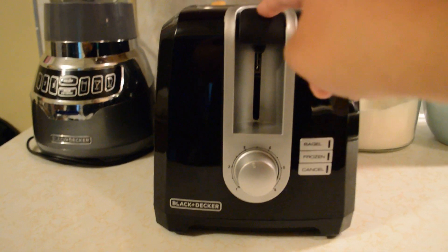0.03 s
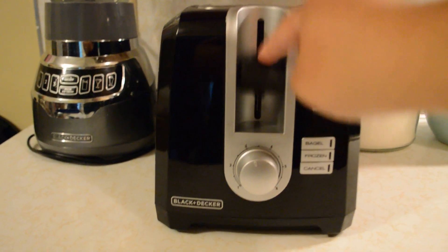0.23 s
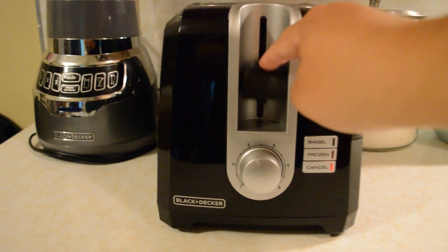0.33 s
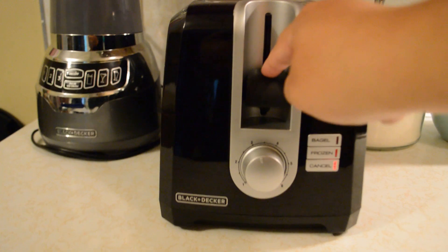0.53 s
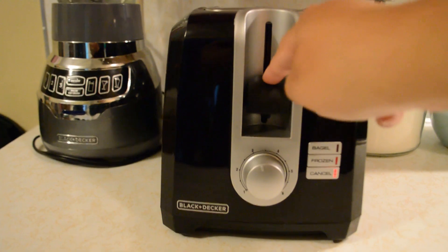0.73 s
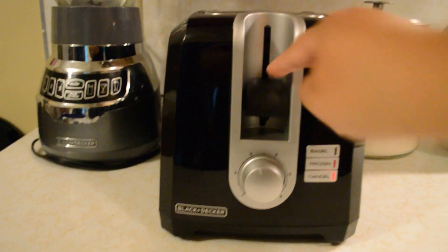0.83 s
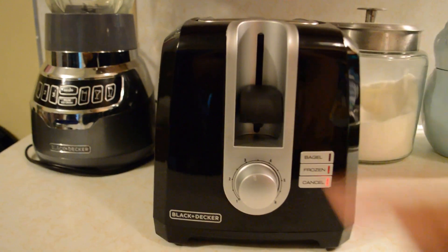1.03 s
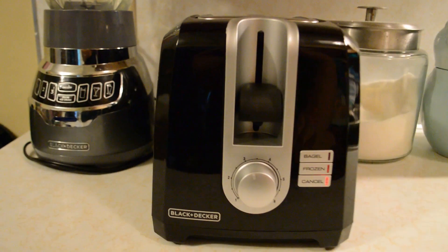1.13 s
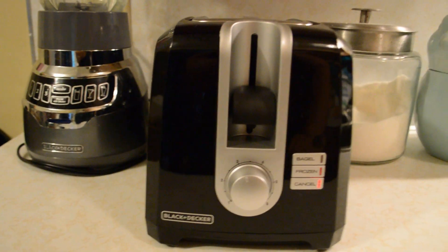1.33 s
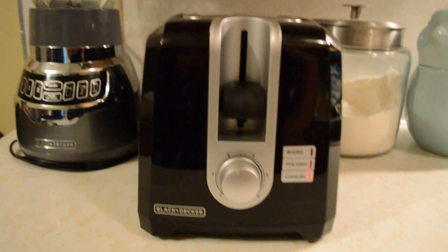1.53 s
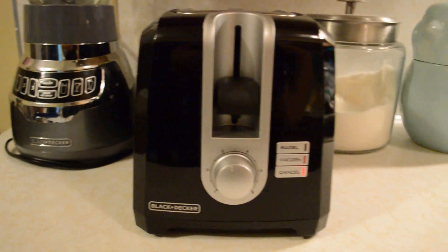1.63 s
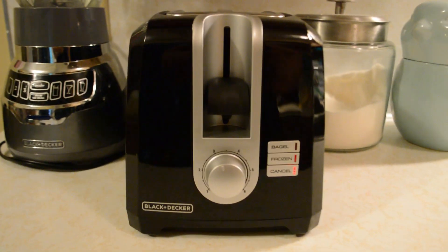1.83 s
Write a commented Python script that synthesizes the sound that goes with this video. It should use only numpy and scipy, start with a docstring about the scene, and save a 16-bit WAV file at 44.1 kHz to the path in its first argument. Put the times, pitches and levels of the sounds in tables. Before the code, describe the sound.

A toaster lever is pushed down, close and mono, in a quiet kitchen. Faint touches and finger rubbing lead to a knock at 0.2 s, then a gritty, jerky metal scrape with a slight squeak until 0.45 s. A sharp clack at 0.46 s rings and rattles briefly with a case thud. A softer double knock comes at 0.72 s. Steady hiss and low hum remain, with tiny ticks from 1.37 to 1.87 s.

```python
"""A finger pushes a toaster lever down in a quiet kitchen, close to a mono microphone.
From the first knock on the knob until after the clack the case thuds on the counter (struck modes).
The finger rubs the knob, the carriage scrapes down its rails in jerks (gritty noise), the latch clacks shut,
the spring rings and loose parts rattle; single-ring ticks are scattered before, during and after the clack.
Room hum, mains hum, a thin whine and microphone hiss lie under it all, ducked a little by gain control."""
import sys
import numpy as np
from scipy import signal
from scipy.fft import rfft, irfft
from scipy.io import wavfile
from scipy.ndimage import uniform_filter1d

SR = 44100
rng = np.random.default_rng(int(sys.argv[2]) if len(sys.argv) > 2 else 0)


def ratio_of_db(decibels):
    """Turn decibels (scalar or array-like) into linear amplitude factors; 0 dB maps to 1."""
    return 10 ** (np.asarray(decibels, float) / 20)


def store_pcm(level_fs):
    """Save levels as 16-bit WAV."""
    pcm = np.round(np.clip(level_fs, -1, 1) * 32767).astype(np.int16)
    wavfile.write(sys.argv[1], SR, np.atleast_2d(pcm).T)


N = 83790


def set_rms(x, rms_db):
    """Scale to an rms level."""
    return x * ratio_of_db(rms_db) / np.sqrt(np.mean(x ** 2))


def shape_spectrum(x, table):
    """Filter by (frequency, level) points, interpolated over log frequency."""
    hz, db = np.array(table, float).T
    bin_hz = np.maximum(np.arange(N // 2 + 1) * SR / N, 1)
    gain = ratio_of_db(np.interp(np.log(bin_hz), np.log(hz), db))
    return irfft(rfft(x) * gain, N)


def ring(x, hz, t60_s):
    """One damped mode driven by x: a unit impulse rings at amplitude 1."""
    pole = np.exp(2j * np.pi * hz / SR - np.log(1000) / (t60_s * SR))
    return signal.lfilter([1], [1, -pole], x).imag


def resonant_noise(hz, width_hz):
    """White noise through one resonance; its decay time follows from the bandwidth."""
    return ring(rng.standard_normal(N), hz, np.log(1000) / np.pi / width_hz)


def gain_curve(table):
    """Gain from (time, level) points, silent outside them."""
    s, db = np.array(table, float).T
    return ratio_of_db(np.interp(np.arange(N) / SR, s, db, left=-120, right=-120))


def fade(start_s, db, t60_s):
    """Gain that jumps up at start_s and decays exponentially."""
    t = np.arange(N) / SR - start_s
    return (t > 0) * ratio_of_db(db - 60 * np.maximum(t, 0) / t60_s)


def strike(blows, modes, chatter_db, chatter_t60_s):
    """Each blow is a smooth push plus dying noisy chatter (level re the blow), driving a body's modes."""
    t = np.arange(N) / SR
    force = np.zeros(N)
    noise = rng.standard_normal(N)
    for s, db, contact_ms in blows:
        phase = np.clip((t - s) * 1000 / contact_ms, 0, 1)
        push = np.sin(np.pi * phase) ** 2
        force += ratio_of_db(db) * push / max(push.sum(), 1e-9)
        force += noise * fade(s, db + chatter_db, chatter_t60_s)
    # alternate signs between neighbouring modes
    return sum((-1) ** k * ratio_of_db(db) * ring(force, hz, t60_s) for k, (hz, db, t60_s) in enumerate(modes))


# knob modes: (frequency [Hz], level [dB], t60 [s])
KNOB_MODES = [(980, -4, .025), (1148, -3, .06), (1250, -6, .03), (1630, -5, .025), (1980, -5, .02),
              (2264, -5, .025), (2590, -1, .02), (3250, -7, .012)]
# blows on the knob: (time [s], level [dB], contact [ms])
KNOB_HITS = [(.0432, -29.5, 0.32), (.2152, -18, .1), (.2168, -18.5, 0.082), (.2215, -16, 0.53),
             (.2290, -26, 0.33), (.2435, -28, 0.64), (.7150, -30.5, 0.14), (.7205, -26.5, 0.48),
             (.7380, -37, 0.16)]


def knob():
    """Knocks on the knob ring its short modes."""
    return strike(KNOB_HITS, KNOB_MODES, chatter_db=-40, chatter_t60_s=.12)


# finger friction on the knob: (time [s], level [dB])
RUB_CURVE = [(0.1, -68), (0.124, -40), (0.14, -37), (0.205, -37.5)]


def finger_rub():
    """Friction of finger on knob: noise in one broad resonance."""
    return gain_curve(RUB_CURVE) * set_rms(resonant_noise(hz=2400, width_hz=900), 0)


# scrape spectrum: (frequency [Hz], level [dB per Hz])
SCRAPE_SPECTRUM = [(88, -19), (150, -10), (634, -11), (727, -6), (955, -14), (1180, -5.5), (1750, -8),
                   (2210, -9), (2680, -12.5), (3660, -6), (8310, -5), (10100, -2), (15800, -19)]
CLICKS_PER_S, CLICK_SPREAD_DB, CLICK_SHARE = 9000, 1.8, .6


def grit():
    """Dense uneven micro-clicks over smooth noise, coloured by the rails; unit rms."""
    chance = rng.random(N)
    spread = rng.exponential(size=N)
    sign_noise, smooth = rng.standard_normal((2, N))
    clicks = (chance < CLICKS_PER_S / SR) * np.sign(sign_noise) * ratio_of_db(CLICK_SPREAD_DB * spread)
    mix = CLICK_SHARE * set_rms(clicks, 0) + (1 - CLICK_SHARE) * smooth
    return set_rms(shape_spectrum(mix, SCRAPE_SPECTRUM), 0)


# spring modes, scraped and struck: (frequency [Hz], level [dB], t60 [s])
SPRING_MODES = [(6130, 0.5, 0.0074), (6600, -6, 0.02), (7250, -3.5, 0.012), (8570, 7, 0.013),
                (9180, -0.5, 0.019), (10390, 4, 0.017), (11000, -9, 0.013), (10940, 0, 0.023),
                (11500, -17, .015), (11900, 1, .015), (13200, 1, 0.014), (14040, -2, .015)]
# carriage scrape: (time [s], level [dB])
SCRAPE_CURVE = [(.196, -37), (.203, -33), (.208, -25.5), (.216, -23.5), (.224, -30.5), (.250, -41),
                (.260, -31), (.272, -42), (.310, -31.5), (.319, -40), (.324, -22), (.333, -26.5),
                (.350, -31), (.357, -25), (.365, -26.5), (.375, -26), (.380, -25), (.389, -25.5),
                (.394, -31), (.408, -33), (.418, -26), (.430, -43), (.440, -35), (.448, -40)]
SPRING_DB = -4.5  # spring ringing: rms re grit
RAIL_HZ, RAIL_WIDTH_HZ, RAIL_DB = 3500, 150, -16.5
SQUEAK_HZ, SQUEAK_WIDTH_HZ = 5490, 60


def carriage():
    """Jerky scrape: grit plus noise-driven spring and rail ringing, with one narrow-band squeak."""
    spring_ring = sum(ratio_of_db(db) * ring(rng.standard_normal(N), hz, t60_s) for hz, db, t60_s in SPRING_MODES)
    rail_ring = resonant_noise(RAIL_HZ, RAIL_WIDTH_HZ)
    scrape = grit() + set_rms(spring_ring, SPRING_DB) + set_rms(rail_ring, RAIL_DB)
    squeak = set_rms(resonant_noise(SQUEAK_HZ, SQUEAK_WIDTH_HZ), 0)
    return scrape * gain_curve(SCRAPE_CURVE) + squeak * fade(start_s=.2585, db=-38, t60_s=.5)


# latch modes: (frequency [Hz], level [dB], t60 [s])
LATCH_MODES = [(733, -11, 0.065), (1006, -10, 0.058), (1077, -19, .07), (1335, -1, .03), (1490, 0, .03),
               (1583, -4.5, .04), (1653, -8, 0.038), (1855, -4.5, 0.037), (2190, -12.5, 0.035),
               (2410, -15.5, 0.055), (3110, -5, 0.011), (4190, -9, 0.022), (5080, -6.5, 0.023)]
# blows on the latch: (time [s], level [dB], contact [ms])
LATCH_HITS = [(.4515, -36, .15), (.4564, -14, .12), (.4578, -15, .12), (.4613, -17, .2), (.4720, -30, .3),
              (.4930, -34, .3), (.5130, -36, .2)]


def latch():
    """The clack: sub-millisecond blows on the latch modes."""
    return strike(LATCH_HITS, LATCH_MODES, chatter_db=-44, chatter_t60_s=.2)


# blows on the spring: (time [s], level [dB], contact [ms])
SPRING_HITS = [(.4563, -16, .04), (.4574, -14, .04), (.4592, -14, .04), (.4615, -22, .04),
               (.4640, -19, .04)]


def spring():
    """Very short blows ring the spring's high modes along with the clack."""
    return strike(SPRING_HITS, SPRING_MODES, chatter_db=-42, chatter_t60_s=.12)


def rattle():
    """Loose parts rattle after the latch: decaying grit."""
    return grit() * fade(start_s=.458, db=-21, t60_s=.13)


# case modes: (frequency [Hz], level [dB], t60 [s])
CASE_MODES = [(251.9, -1, 0.18), (291, -9.5, 0.14), (363.5, -4, 0.14), (420, 0.5, 0.041), (502, 2.5, 0.044),
              (601, -9, 0.077), (723, -6.5, 0.078), (885, -1, 0.072)]
# blows on the case: (time [s], level [dB], contact [ms])
CASE_HITS = [(.044, -40.5, 1.1), (.216, -31, 0.48), (.230, -35, 0.94), (.360, -46, 1.3),
             (.457, -25.5, 0.48), (.463, -28.5, 1.37), (.485, -31.5, 1.3), (.512, -49, 0.33),
             (.715, -32.5, 1.5), (.721, -29, 2), (.748, -38, 2.7)]
# lowest body modes: (frequency [Hz], level [dB], t60 [s])
BASE_MODES = [(78.6, -7, 0.27), (122, -13.5, 0.13), (164.5, -1, 0.3), (199, -3, 0.061)]
# blows on the base: (time [s], level [dB], contact [ms])
BASE_HITS = [(.050, -41, 4.3), (.265, -34.5, 5.8), (.305, -36.5, 2.3), (.375, -42, 5), (.458, -33, 2),
             (.483, -34, 1), (.716, -28, 4)]


def case():
    """Thuds on the counter: blows ring the low modes of base and case."""
    low = strike(BASE_HITS, BASE_MODES, chatter_db=-46, chatter_t60_s=.15)
    return low + strike(CASE_HITS, CASE_MODES, chatter_db=-46, chatter_t60_s=.15)


# small ticks: (time [s], level [dB], frequency [Hz], t60 [s])
TICK_EVENTS = [(.0792, -36, 10400, .006), (.1120, -24, 9450, .006), (0.1547, -17, 9700, 0.0026),
               (.1960, -29, 2160, 0.026), (0.2083, -26, 10300, 0.0039), (0.2103, -17, 6860, .006),
               (.3570, -6.5, 11500, 0.0032), (.4512, -12, 7400, .008), (.4528, -17, 8300, .012),
               (.4540, -19, 6900, .01), (1.372, -24, 9900, 0.01), (1.428, -39, 1730, .03),
               (1.595, -21, 9840, .008), (1.646, -29.5, 2670, 0.013), (1.717, -34, 4200, 0.012),
               (1.844, -29, 1300, 0.0066), (1.870, -36, 1630, 0.022)]


def ticks():
    """Tiny parts touching: each an impulse into one short mode."""
    total = np.zeros(N)
    for s, db, hz, t60_s in TICK_EVENTS:
        impulse = np.zeros(N)
        impulse[int(s * SR)] = 1
        total += ratio_of_db(db) * ring(impulse, hz, t60_s)
    return total


ROOM_T60_S, ROOM_DB = .25, -13


def kitchen_echo(near):
    """Diffuse reflections: convolution with a decaying noise tail of unit energy."""
    t = np.arange(SR // 2) / SR
    tail = rng.standard_normal(len(t)) * ratio_of_db(-60 * t / ROOM_T60_S) * (t > .004)
    tail /= np.sqrt(np.sum(tail ** 2))
    return ratio_of_db(ROOM_DB) * signal.fftconvolve(near, tail)[:N]


def tone(hz, rms_db):
    """Steady sine at an rms level."""
    return np.sqrt(2) * ratio_of_db(rms_db) * np.sin(2 * np.pi * hz * np.arange(N) / SR)


# hiss spectrum: (frequency [Hz], level [dB per Hz])
HISS_SPECTRUM = [(15, -57), (25, -39), (53, -9), (70, -16), (91, -30), (108, -12), (157, -7), (180, -36.5),
                 (255, -5.5), (326, -10), (463, -8.5), (516, -13), (934, -14.5), (1160, -15), (2680, -13.5),
                 (4130, -15.5), (7690, -13), (10100, -3.5), (16000, -24.5)]
HISS_DB, FLICKER_DB = -35.5, 0.66  # rms before flicker; flicker standard deviation
HUM_HZ, HUM_WIDTH_HZ, HUM_DB = 257, 22, -52.5


def background():
    """Shaped noise hiss with a slight flicker, wavering narrow-band hum, mains hum and thin whine."""
    walk = uniform_filter1d(rng.standard_normal(N), size=900)
    hiss = set_rms(shape_spectrum(rng.standard_normal(N), HISS_SPECTRUM), HISS_DB)
    hiss *= ratio_of_db(FLICKER_DB * walk / walk.std())
    hum = set_rms(resonant_noise(HUM_HZ, HUM_WIDTH_HZ), HUM_DB)
    return hiss + hum + tone(hz=58.5, rms_db=-66) + tone(hz=15658, rms_db=-56)


def scene():
    """Toaster, kitchen echo and background, identical in both channels."""
    near = knob() + finger_rub() + carriage() + latch() + spring() + rattle() + case() + ticks()
    return np.tile(near + kitchen_echo(near) + background(), (2, 1))


def roll_off(x):
    """The treble ends steeply here."""
    return signal.sosfilt(signal.butter(12, 16100, fs=SR, output="sos"), x)


GAIN_RATIO, GAIN_TIME_S, GAIN_THRESHOLD_DB = 1.5, .12, -25.5
LOW_CUT_HZ, HIGH_CUT_HZ, CEILING = 42, 15900, 1.15


def record(dry):
    """Slow gain control ducks loud moments, tanh rounds the peaks, filters cut both ends."""
    a = 1 / (GAIN_TIME_S * SR)
    envelope = np.sqrt(signal.lfilter([a], [1, a - 1], dry[0] ** 2))
    threshold = ratio_of_db(GAIN_THRESHOLD_DB)
    gain = (threshold / np.maximum(envelope, threshold)) ** (1 - 1 / GAIN_RATIO)
    low_cut = signal.butter(2, LOW_CUT_HZ, "high", fs=SR, output="sos")
    mic = signal.sosfilt(low_cut, dry) * gain
    rounded = CEILING * np.tanh(mic / CEILING)
    high_cut = signal.ellip(10, .2, 70, HIGH_CUT_HZ, fs=SR, output="sos")
    mix = signal.sosfilt(high_cut, rounded)
    return roll_off(mix)


dry = scene()
out = record(dry)
store_pcm(out)
```